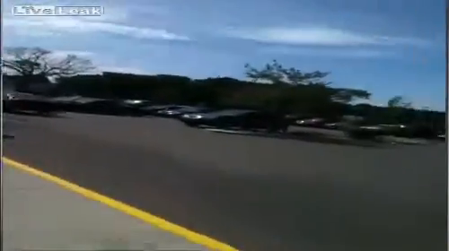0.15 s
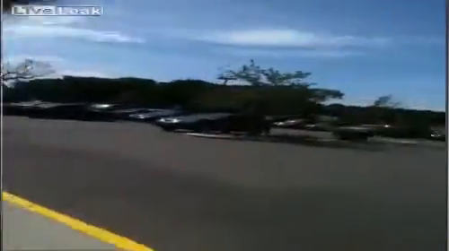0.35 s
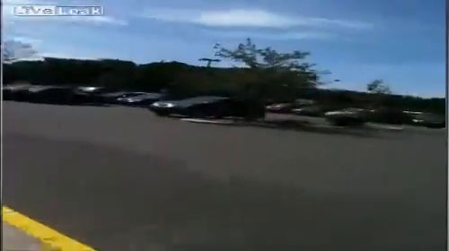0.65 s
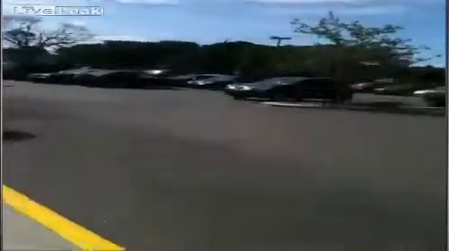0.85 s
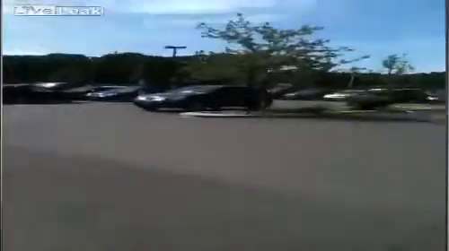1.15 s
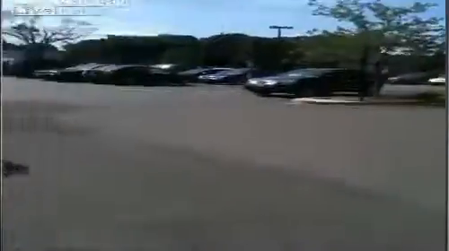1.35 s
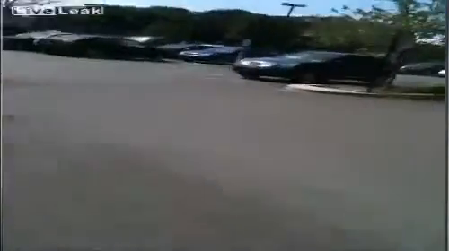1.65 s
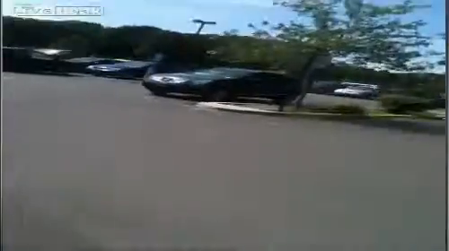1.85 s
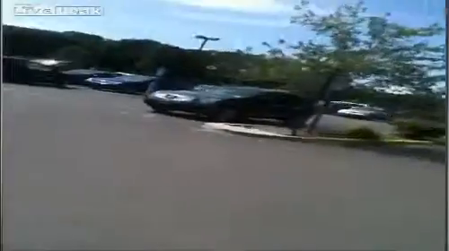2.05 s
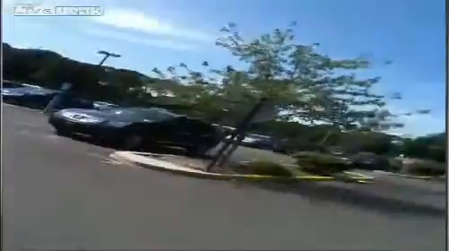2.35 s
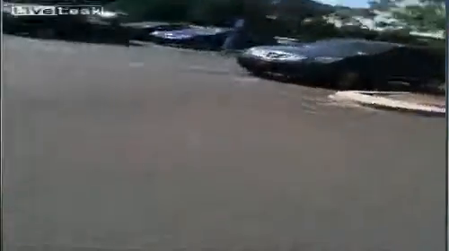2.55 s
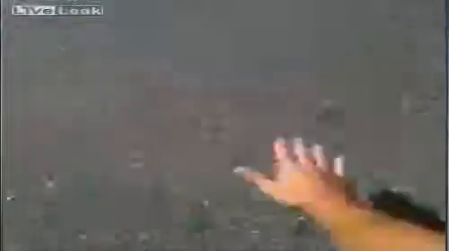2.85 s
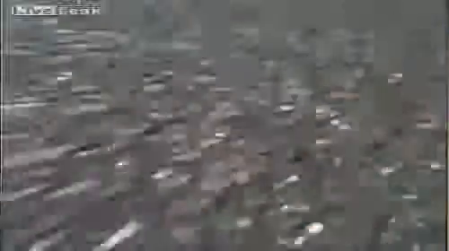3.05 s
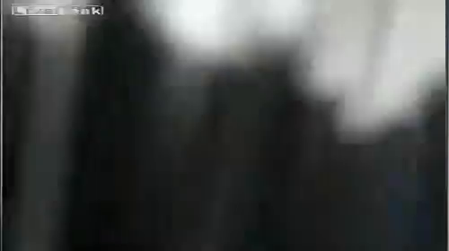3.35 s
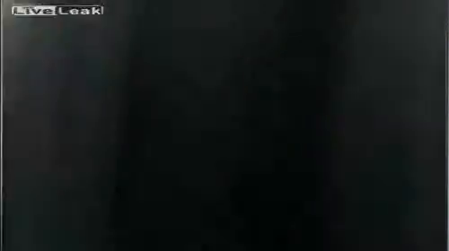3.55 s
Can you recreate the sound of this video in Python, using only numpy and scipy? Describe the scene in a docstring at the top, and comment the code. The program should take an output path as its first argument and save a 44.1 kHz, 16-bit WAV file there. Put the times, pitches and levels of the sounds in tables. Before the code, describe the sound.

Bicycle crash on asphalt: quiet tyre rumble and rattles, sudden metallic clatter, then harsh grinding thumps.

```python
"""A bicycle with a small camera on board rolls over asphalt: lumpy tyre noise, rumble and harmonic tread hum.
Blows (bump, thud, ringing clack, tick) rattle it, gritty scuffs brush it; two jolts set fine ticks going.
It goes down in a clatter: blows ring the frame, stony grit scrapes, a decaying sine booms; noise echoes faintly.
The camera is knocked about (cracks, damped thumps, hollow modes) and grinds along in coloured grit,
with friction noise singing through gliding resonances, and its microphone overloads."""
import sys
import numpy as np
from scipy import signal
from scipy.fft import rfft, irfft
from scipy.io import wavfile

SR = 44100
rng = np.random.default_rng(int(sys.argv[2]) if len(sys.argv) > 2 else 0)


def put_to_file(sound):
    """Save the sound as 16-bit audio at rate SR, in the file named by the first command-line argument."""
    columns = np.atleast_2d(sound).T  # one column per channel
    safe = np.clip(columns, -1, 1)
    whole_steps = np.round(safe * 32767)
    wavfile.write(sys.argv[1], SR, whole_steps.astype(np.int16))


N = 163170
T = np.arange(N) / SR
EDGE_HZ = 7960  # top of the grit pings and of the microphone's band
LN_1000 = np.log(1000)  # 60 dB as an exponent


def amp(db):
    """Decibels to gain."""
    return 10 ** (np.asarray(db) / 20)


def unit(x):
    """Scales to an rms of one."""
    return x / np.sqrt(np.mean(x ** 2) + 1e-20)


def curve(table, axis=1):
    """One column of a time table, interpolated for every sample."""
    rows = np.array(table)
    return np.interp(T, rows[:, 0], rows[:, axis])


def add(mix, start_s, sound):
    """Adds a sound to the mix in place, cut at the end."""
    part = mix[max(round(start_s * SR), 0):][:len(sound)]
    part += sound[:len(part)]


def band(x, hz, kind, order=3):
    """Causal Butterworth low-, high- or band-pass."""
    sos = signal.butter(order, np.clip(hz, 10, SR * .49), kind, fs=SR, output="sos")
    return signal.sosfilt(sos, x)


def colour(x, points, size=4096):
    """Minimum-phase filter with the given spectrum, keeping the power of white noise."""
    point_hz, point_db = np.transpose(points)
    hz = abs(np.fft.fftfreq(size, 1 / SR))
    gain = amp(np.interp(np.log(hz + 1), np.log(point_hz), point_db))
    gain = gain / (1 + (hz / 9000) ** 16)  # steep top cut
    log_gain = np.log(gain + 1e-5)
    taps = np.fft.ifft(np.exp(np.conj(signal.hilbert(log_gain)))).real[:size // 2]
    return signal.oaconvolve(x, taps / np.linalg.norm(taps))[:len(x)]


def drift(rate_hz):
    """Low-passed noise with an rms of one; the filter's first second is dropped."""
    return unit(band(rng.standard_normal(N + SR), rate_hz, "low", order=2)[SR:])


def grit(per_s, spread_db, clump_db, clump_hz, hiss, ping_s, count=40):
    """Clumped tiny collisions, brief pings of random size at 40 pitches, over a finer hiss."""
    t = np.arange(1024) / SR
    pings = np.zeros(N)
    for hz in (np.arange(count) + rng.random(count)) * EDGE_HZ / count:
        size, chance = rng.random((2, N))
        hits = chance < per_s / count / SR
        train = amp(spread_db * np.minimum(-np.log(1 - size), 3)) * hits
        ping = np.cos(2 * np.pi * (hz * t + rng.random())) * np.exp(-t / ping_s)
        pings += unit(signal.oaconvolve(train, ping)[:N])
    grains = unit(pings - pings.mean()) + hiss * rng.standard_normal(N)
    return unit(grains * amp(clump_db * drift(clump_hz)))


def brighten(x, treble_db, corner_hz=2900):
    """Raises or lowers the treble above the corner."""
    hz = np.fft.rfftfreq(N, 1 / SR)
    low = irfft(rfft(x) / (1 + (hz / corner_hz) ** 6), N)
    return low + amp(treble_db) * (x - low)


def burst(decay_s, size=4096):
    """A contact: one sharp touch and a cluster of micro-impacts dying to 1/e in decay_s."""
    n = np.arange(size)
    first_touch = 6.5 * (n == 0)
    return (rng.standard_normal(size) + first_touch) * np.exp(-n / SR / decay_s)


def sized(x, db):
    """Gives a short sound the energy of 8 ms at this rms level."""
    return amp(db) * x / np.sqrt(np.sum(x ** 2) / (.008 * SR))


# Rolling noise. Each row: time in seconds, level in dB.
ROLL_S_DB = [(0, -44), (.3, -43), (.75, -44), (1.13, -46.5), (1.5, -43), (1.75, -45), (2, -42.5),
             (2.28, -41.5), (2.5, -38), (2.9, -39)]
# Rolling noise spectrum. Each row: frequency in Hz, relative density in dB per Hz.
ROLL_SPECTRUM_HZ_DB = [(30, -33), (70, -16.5), (110, 2), (335, 1.5), (410, -4), (730, -3.5), (1300, -12),
                       (2600, -17.5), (3600, -23.5), (8000, -36)]
# Low rumble of the moving bicycle. Each row: time in seconds, level in dB.
RUMBLE_S_DB = [(0, -54), (1.1, -75), (1.7, -51), (2.3, -47.5), (2.42, -28.5), (2.52, -46.5), (2.9, -50)]
# Tread hum. Each row: time in seconds, fundamental in Hz, level in dB.
TREAD_S_HZ_DB = [(0, 46.6, -47.5), (.37, 46.27, -47), (.62, 42.81, -56), (2.8, 41.45, -50.5)]
# Bicycle resonances shaping the hum's harmonics. Each row: frequency in Hz, gain in dB.
HUM_SPECTRUM_HZ_DB = [(85, -13.5), (135, 3), (165, -1.5), (187, 2.5), (212, -5.5), (265, -13), (328, -8),
                      (355, -14.5), (555, -11), (800, -14)]


def tyres():
    """Lumpy rolling noise, band-passed rumble, and fluttering tread harmonics that sag as the bicycle slows."""
    grains = grit(per_s=2800, spread_db=1, clump_db=1.0, clump_hz=40, hiss=2.27, ping_s=0.0043)
    roll = colour(grains, ROLL_SPECTRUM_HZ_DB)
    rumble = unit(band(rng.standard_normal(N), [112, 281], "band", order=4))

    pitch_hz = curve(TREAD_S_HZ_DB) * (1 + 0.0047 * drift(9.5))
    turns = np.cumsum(pitch_hz) / SR
    mode_hz, mode_db = np.transpose(HUM_SPECTRUM_HZ_DB)
    hum = np.zeros(N)
    for k in range(2, 17):  # no fundamental
        level_db = np.interp(k * pitch_hz, mode_hz, mode_db) + 1.5 * drift(9)
        hum += amp(level_db) * np.sin(2 * np.pi * (k * turns + rng.random()))

    out = roll * amp(curve(ROLL_S_DB)) + rumble * amp(curve(RUMBLE_S_DB))
    return out + np.sqrt(2) * hum * amp(curve(TREAD_S_HZ_DB, axis=2))


# Ringing of the bicycle. Each row: frequency in Hz, relative level in dB, 60 dB decay time in seconds.
FRAME_HZ_DB_T60 = [(517, 2.5, 0.092), (1203, -3.5, 0.18), (1600, -7.5, 0.2), (1852, 1.5, 0.15),
                   (2070, -1, 0.15), (2720, 4, 0.081), (4200, 1, 0.18)]


def ring(x, ring_db):
    """Adds the frame's decaying modes to whatever shakes it."""
    t = np.arange(SR // 3) / SR
    modes = np.zeros(len(t))
    for hz, db, t60_s in FRAME_HZ_DB_T60:
        gain = amp(db) * 4 * LN_1000 / (t60_s * SR)  # slower decays start lower
        modes += gain * np.exp(-LN_1000 * t / t60_s) * np.cos(2 * np.pi * hz * t)
    return x + amp(ring_db) * signal.oaconvolve(x, modes)[:N]


# Blows in the frame and loose parts.
# Each row: start in seconds, clack in dB, pitch of the struck part in Hz, thud in dB, tick in dB.
BLOWS = [(0.688, -37.5, 920, -45, -56), (0.688, -46.5, 1680, -50, -66), (.736, -51, 2330, -43, -53.5),
         (1.421, -36, 483, -37.5, -71), (1.434, -36.5, 400, -46, -71), (1.477, -40, 549, -41, -61),
         (1.516, -43, 1510, -49, -54), (1.68, -37.5, 804, -46, -77), (1.786, -46, 2080, -51, -62),
         (1.811, -42.5, 4200, -42.5, -64), (1.828, -34, 725, -44, -78), (1.869, -38, 2670, -40, -68),
         (1.978, -46.5, 4420, -57, -59), (2.017, -34.5, 1580, -37.5, -57), (2.021, -34.5, 2730, -52, -64),
         (2.073, -30.5, 1396, -34.5, -47), (2.324, -25.5, 1390, -28.5, -21.5), (2.388, -38, 3280, -32, -50),
         (2.397, -37, 1130, -33, -50), (2.418, -25, 1130, -36, -43), (2.418, -21.5, 2020, -29, -41),
         (2.445, -35.5, 1210, -32, -47), (2.514, -50, 1944, -33.5, -56), (2.611, -31, 166, -42, -53),
         (2.708, -43.5, 2230, -39, -71), (2.763, -46, 2442, -49.5, -47), (2.907, -14, 1955, -20, -45),
         (2.911, -16, 480, -24, -41), (2.914, -15.5, 1250, -27, -37), (2.932, -17, 1265, -25.5, -28),
         (2.94, -16.5, 2420, -29.5, -30), (2.96, -15, 1236, -41, -36.5), (2.989, -10, 1820, -24, -30),
         (3.003, -17, 1130, -21, -19), (3.038, -23.5, 2800, -22.5, -30.5),
         (3.103, -21.5, 2370, -26.5, -27.5), (3.127, -28, 1630, -38, -45), (3.148, -16, 1750, -16.5, -23.5),
         (3.153, -21, 188, -23, -26), (3.178, -39, 685, -23, -34.5), (3.2055, -12.5, 2440, -44, -21.5)]
CLACK_S, THUD_S, TICK_S = 0.0054, 0.0054, 0.0054  # decay to 1/e
CLACK_SPREAD = 1.24  # clack band edges: pitch divided and multiplied by this
PART_Q, PART_DB = 18.5, 1.5  # the struck part's ring; level relative to the broad clack
MOUNT_HZ, MOUNT_RISE_S, MOUNT_DECAY_S = 189.5, 0.0021, 0.0045
MOUNT_DB = -2.5  # relative to the thud


def blows():
    """Camera mount bump, thud, clack through the struck part's resonance, and tick, ringing the frame."""
    out = np.zeros(N)
    t = np.arange(4096) / SR
    bump = np.sin(2 * np.pi * MOUNT_HZ * t) * (1 - np.exp(-t / MOUNT_RISE_S)) * np.exp(-t / MOUNT_DECAY_S)
    for start_s, clack_db, hz, thud_db, tick_db in BLOWS:
        contact = burst(CLACK_S)
        part = signal.lfilter(*signal.iirpeak(hz, PART_Q, SR), contact)
        broad = band(contact, [hz / CLACK_SPREAD, hz * CLACK_SPREAD], "band", order=2)
        clack = unit(broad) + amp(PART_DB) * unit(part)
        thud = band(burst(THUD_S), [260, 850], "band")
        tick = band(band(burst(TICK_S), 2800, "high"), 4600, "low")
        add(out, start_s, sized(clack, clack_db))
        add(out, start_s, sized(thud, thud_db) + sized(bump, thud_db + MOUNT_DB))
        add(out, start_s, sized(tick, tick_db))
    return ring(out, ring_db=-9)


def echoes(x, level_db=-15, t60_s=0.44):
    """Faint scatter from the ground and parked cars: a low-passed, decaying noise tail after 5 ms."""
    t = np.arange(SR // 2) / SR
    scatter = rng.standard_normal(len(t)) * (t > .005) * np.exp(-LN_1000 * t / t60_s)
    tail = band(scatter, 3900, "low", order=1)
    return amp(level_db) * signal.oaconvolve(x, tail / np.linalg.norm(tail))[:N]


# Grit and cloth brushing.
# Each row: start in seconds, length in seconds, level in dB, treble in dB, rise in seconds, fall in seconds.
BRUSHES = [(1.403, 0.12, -52, 2.5, 0.04, 0.0087), (1.58, 0.035, -49, 2.5, .015, .008),
           (1.782, .03, -36.5, -6, 0.0057, 0.021), (1.831, 0.053, -39, -10, 0.031, 0.044),
           (2.309, 0.024, -28.5, 4.5, 0.0042, 0.0061), (2.346, 0.11, -37, 0, 0.046, 0.014),
           (2.464, 0.15, -45, 0, 0.042, 0.018), (2.638, 0.13, -46.5, -20, 0.014, 0.056),
           (2.763, 0.24, -39.5, 1.5, .14, .005)]
# Brushing spectrum. Each row: frequency in Hz, relative density in dB per Hz.
BRUSH_SPECTRUM_HZ_DB = [(60, -50.5), (200, 7), (700, 1), (1300, 6), (1800, 2.5), (2600, 4), (3300, -6),
                        (4700, -4), (6000, -7.5), (8000, -17.5)]


def brushes():
    """Gritty scuffs with a linear swell and an exponential fall."""
    grains = grit(per_s=3000, spread_db=0, clump_db=1.5, clump_hz=90, hiss=.6, ping_s=0.0023)
    grains = colour(grains, BRUSH_SPECTRUM_HZ_DB)
    out = np.zeros(N)
    for start_s, length_s, db, treble_db, rise_s, fall_s in BRUSHES:
        rise = np.clip((T - start_s) / rise_s, 0, 1)
        fall = np.exp(-np.maximum(T - start_s - length_s, 0) / fall_s)
        out += amp(db) * rise * fall * brighten(grains, treble_db)
    return out


# Chain and cables ticking after the jolts. Each row: time in seconds, level in dB.
RATTLE_S_DB = [(2.31, -48), (2.39, -49), (2.52, -57.5), (2.9, -62)]


def rattle():
    """Sparse band-passed ticks of the chain and cables, settling after the jolts."""
    ticks = grit(per_s=320, spread_db=9, clump_db=1.0, clump_hz=30, hiss=.1, ping_s=0.0016)
    ticks = unit(band(ticks, [1780, 5200], "band", order=2))
    return ticks * amp(curve(RATTLE_S_DB)) * (T > RATTLE_S_DB[0][0])


# Bicycle sliding on asphalt. Each row: time in seconds, level in dB before SLIDE_TRIM_DB, treble in dB.
SLIDE = [(2.9, -41, 18.5), (2.915, -25.5, 9), (2.945, -15, -1), (3.005, -16, 3), (3.03, -23.5, 14),
         (3.055, -21, 1), (3.09, -38.5, 12.5), (3.11, -18, 1), (3.16, -33, 11.5), (3.195, -40.5, 13),
         (3.22, -26, 1.5), (3.25, -37, 1)]
# Sliding spectrum. Each row: frequency in Hz, relative density in dB per Hz.
SLIDE_SPECTRUM_HZ_DB = [(40, -29), (150, 3), (450, 2), (850, -1.5), (1300, -2.5), (2000, 3), (2700, -2.5),
                        (3700, -12), (5500, -12), (8000, -21)]
SLIDE_TRIM_DB = -3.5


def slide():
    """The fallen bicycle scrapes over stones in the asphalt: coloured grit that rings the frame."""
    grains = grit(per_s=1800, spread_db=4.5, clump_db=2.0, clump_hz=160, hiss=0.9, ping_s=0.0039)
    grains = colour(grains, SLIDE_SPECTRUM_HZ_DB)
    touching = (T > SLIDE[0][0]) & (T < SLIDE[-1][0])
    scrape = brighten(grains, curve(SLIDE, axis=2)) * amp(curve(SLIDE) + SLIDE_TRIM_DB) * touching
    return ring(scrape, ring_db=-17.5)


# A wheel booms as it takes the fall. Each row: start in seconds, starting level in dB.
BOOMS = [(2.911, -21), (2.998, -12.5), (3.147, -24.5)]
BOOM_HZ, BOOM_T60_S = 324.8, 0.31


def wheel():
    """The deep boom of a wheel striking the ground: an exponentially decaying sine."""
    out = np.zeros(N)
    t = np.arange(SR // 2) / SR
    for start_s, db in BOOMS:
        add(out, start_s, amp(db - 60 * t / BOOM_T60_S) * np.sin(2 * np.pi * BOOM_HZ * t))
    return out


# Knocks on the camera.
# Each row: start in seconds, thump in dB, thump pitch in Hz, crack in dB, hollow ring in dB.
KNOCKS = [(3.2452, 11, 1050, -2.5, -17), (3.249, 0, 200, -22, -32), (3.2585, -2.5, 175, -15.5, -36),
          (3.267, 10, 290, -23, -33), (3.2699, 14, 100, 0, -9), (3.2752, 13, 215, -15, -25),
          (3.2808, 8, 258, -8, -24), (3.303, -14, 182, -19, -25), (3.3088, -4, 200, -18.5, -32),
          (3.318, 3.5, 175, -18, -30), (3.325, 7.5, 220, -13, -24), (3.361, 8.5, 306, -4, -15),
          (3.408, 2.5, 170, -9.5, -13), (3.467, 3.5, 240, -17, -6), (3.4755, 2, 390, -17, -19),
          (3.497, 11.5, 530, -19, -5.5), (3.5118, 0, 330, -20, -17), (3.532, 2, 500, -6.5, -6),
          (3.5382, -6, 550, -34, -10.5), (3.5562, 5.5, 690, -12, -2.5), (3.5728, 0.5, 420, -26, -21),
          (3.5785, 9, 330, -6.5, -8), (3.601, -2, 330, -7, -10), (3.6215, -5, 290, -20, -9),
          (3.6457, 2.5, 417, -7, -8), (3.669, 8, 340, -1.5, -23), (3.6745, -6, 300, -12, -12),
          (3.697, 2, 446, -28, -19)]
# Hollow modes of the camera case. Each row: frequency in Hz, level in dB, 60 dB decay time in seconds.
CASE_HZ_DB_T60 = [(380, -16, 0.034), (642, 2.5, 0.026), (924, -8, 0.033), (1647, -8.5, 0.045),
                  (3400, -11.5, 0.025)]
# Crack spectrum. Each row: frequency in Hz, relative density in dB per Hz.
CRACK_SPECTRUM_HZ_DB = [(30, -16.5), (300, 10), (1000, 5.5), (1700, 2.5), (2800, -3), (5000, -7.5),
                        (8000, -15.5)]
THUMP_AT_400_HZ_S, THUMP_LINGER = 0.0021, 0.44  # decay to 1/e, longer at lower pitch by this power
THUMP_RISE_S, CRACK_S = 0.0012, 0.0016
CASE_SPREAD = 0.048  # random relative shift of each hollow mode's pitch, drawn anew for every knock


def knocks():
    """Each knock cracks on the case, thumps as a damped sine and rings its hollow modes."""
    thumps, cracks = np.zeros(N), np.zeros(N)
    t = np.arange(SR // 12) / SR
    rise = 1 - np.exp(-t / THUMP_RISE_S)
    for start_s, thump_db, thump_hz, crack_db, hollow_db in KNOCKS:
        decay_s = THUMP_AT_400_HZ_S * (400 / thump_hz) ** THUMP_LINGER
        thump = np.sin(2 * np.pi * thump_hz * t) * np.exp(-t / decay_s)
        hollow = np.zeros(len(t))
        for hz, db, t60_s in CASE_HZ_DB_T60:
            mode_hz = hz * (1 + CASE_SPREAD * rng.standard_normal())
            hollow += amp(db) * np.exp(-LN_1000 * t / t60_s) * np.sin(2 * np.pi * mode_hz * t)
        add(thumps, start_s, (amp(thump_db) * thump + amp(hollow_db) * hollow) * rise)
        add(cracks, start_s, sized(burst(CRACK_S), crack_db))
    return thumps + colour(cracks, CRACK_SPECTRUM_HZ_DB)


def sing(x, table, width_hz):
    """Passes friction through a gliding resonance: shift to 0 Hz, two-pole low-pass, shift back."""
    turn = np.exp(2j * np.pi * np.cumsum(curve(table)) / SR)
    pole = np.exp(-np.pi * width_hz / SR)
    tone = (turn * signal.lfilter([1], [1, -2 * pole, pole * pole], x / turn)).real
    return unit(tone) * amp(curve(table, axis=2)) * (T > table[0][0]) * (T < table[-1][0])


# Camera case grinding on asphalt. Each row: time in seconds, level in dB, treble in dB.
GRIND = [(3.284, -14.5, -15), (3.299, -6, -5.5), (3.303, -44, 24), (3.322, -47, 4), (3.33, -9.5, -2.5),
         (3.35, -9, 0.5), (3.362, -19, 0), (3.385, -10.5, 4.5), (3.408, -15.5, -3), (3.445, -9.5, -5.5),
         (3.465, -18.5, 1), (3.51, -25.5, -1), (3.535, -31, 13), (3.55, -32, 4.5), (3.61, -27, 1.5),
         (3.7, -33.5, -2.5)]
# Grinding spectrum. Each row: frequency in Hz, relative density in dB per Hz.
GRIND_SPECTRUM_HZ_DB = [(30, -31), (90, -10.5), (200, 0), (550, 2.5), (850, -1.5), (1300, -1.5),
                        (2000, -4.5), (3000, -4.5), (4300, -7.5), (5800, -9), (8000, -14.5)]
# Shell resonance rubbed by the ground. Each row: time in seconds, pitch in Hz, level in dB.
SHELL_S_HZ_DB = [(3.327, 1100, -21.5), (3.349, 1210, -32), (3.4, 1277, -8), (3.45, 1600, -21.5),
                 (3.47, 1640, -20)]
# Falling screech of the case as it slows. Each row: time in seconds, pitch in Hz, level in dB.
SCREECH_S_HZ_DB = [(3.357, 4900, -48), (3.371, 4630, -21), (3.385, 4200, -4), (3.413, 3340, -16),
                   (3.47, 2500, -33.5)]


def grind():
    """The camera case grinds in coloured grit, its shell rasping under a falling screech."""
    grains = grit(per_s=4000, spread_db=3.5, clump_db=2.5, clump_hz=200, hiss=0.55, ping_s=0.0031)
    grains = colour(grains, GRIND_SPECTRUM_HZ_DB)
    rough = brighten(grains, curve(GRIND, axis=2)) * amp(curve(GRIND)) * (T > GRIND[0][0])
    screech = sing(rng.standard_normal(N), SCREECH_S_HZ_DB, width_hz=1150)
    shell = sing(rng.standard_normal(N), SHELL_S_HZ_DB, width_hz=360)
    return rough + screech + shell


def scene():
    """The bicycle in the open air, and the sounds made on the camera itself."""
    bicycle = brushes() + blows() + rattle() + slide() + wheel()
    camera = grind() + knocks()
    return (tyres() + bicycle + echoes(bicycle) + camera)[None]


def record(dry):
    """The microphone overloads with a firm knee, loses its deepest bass, then is band-limited."""
    overload = 0.65  # ceiling of the clipped signal
    clipped = dry / (1 + (dry / overload) ** 4) ** .25
    thinned = band(clipped, 62, "high", order=1)
    taps = signal.firwin(401, EDGE_HZ, window=("kaiser", 8), fs=SR)
    return signal.oaconvolve(thinned, taps[None], "same")


dry = scene()
out = record(dry)
put_to_file(out)
```